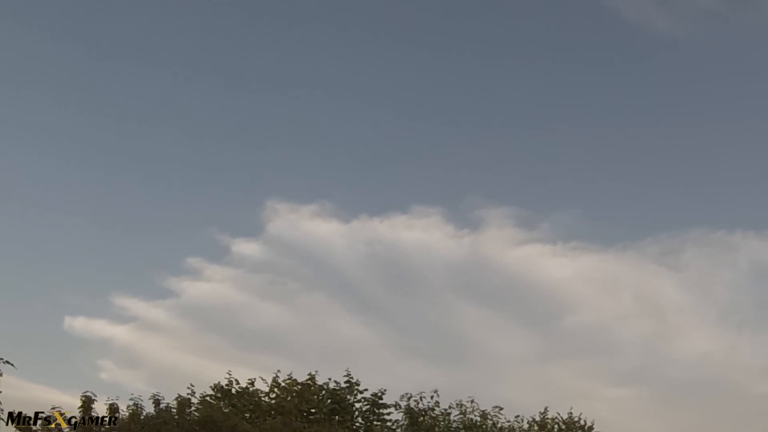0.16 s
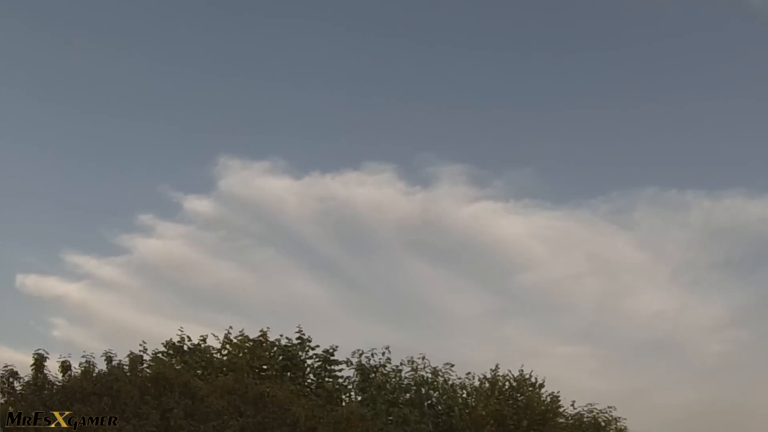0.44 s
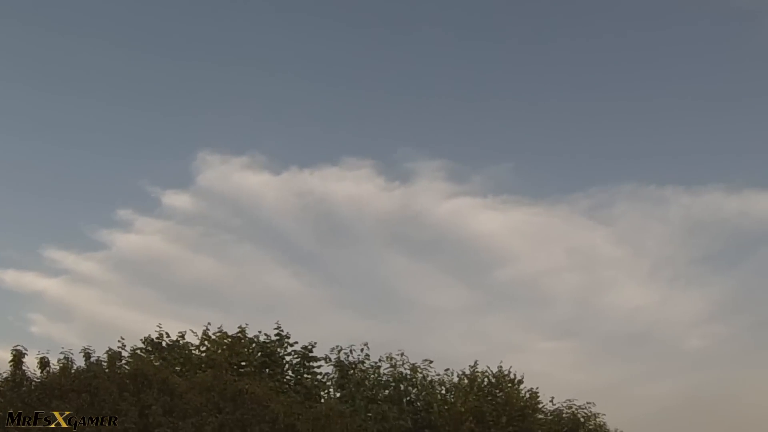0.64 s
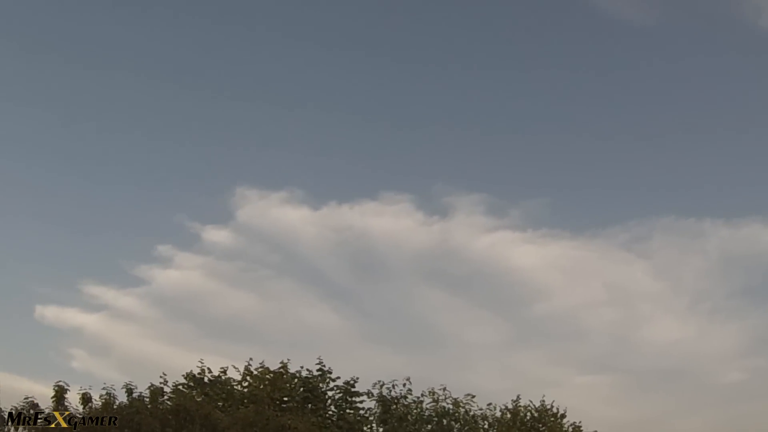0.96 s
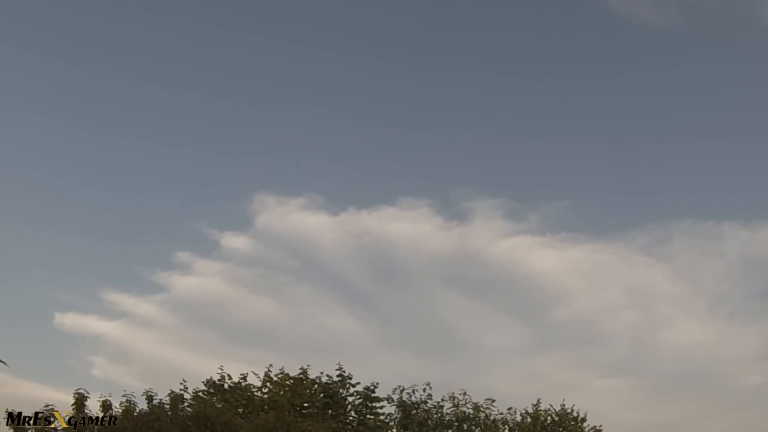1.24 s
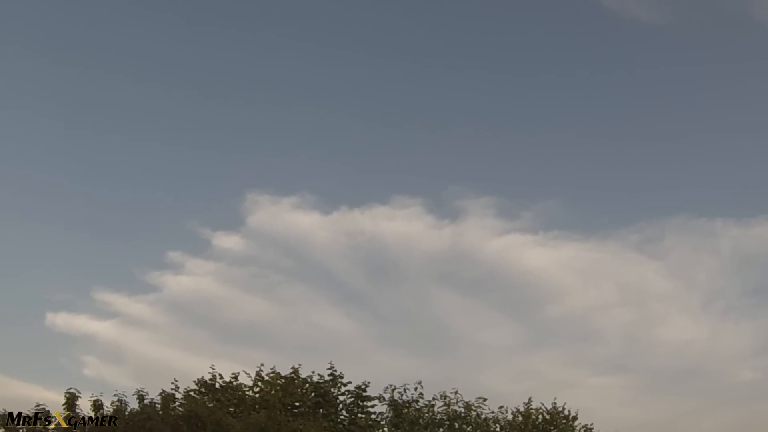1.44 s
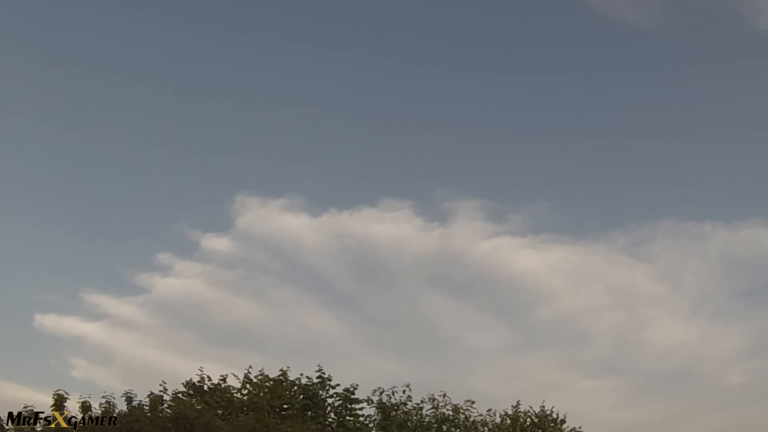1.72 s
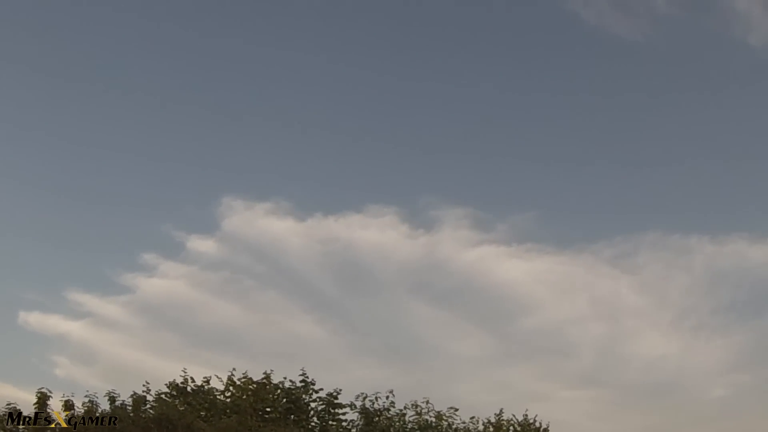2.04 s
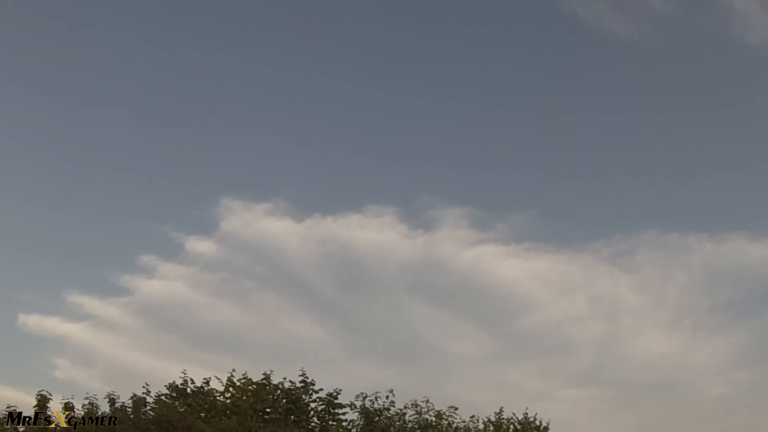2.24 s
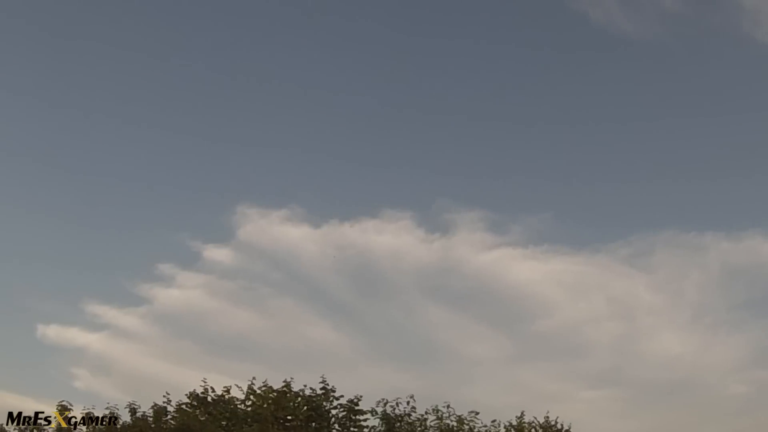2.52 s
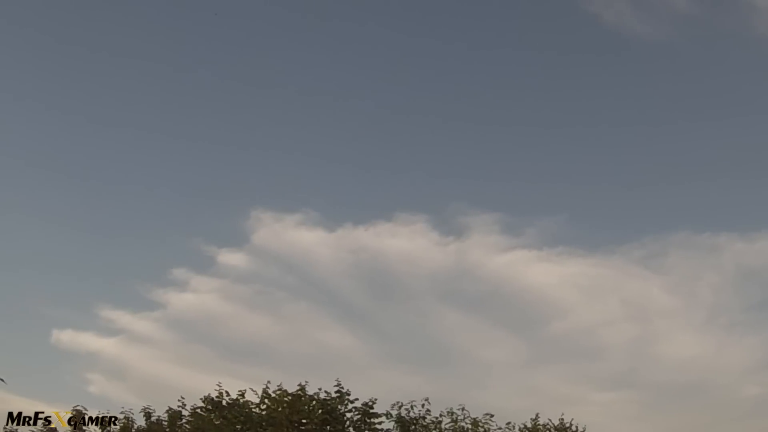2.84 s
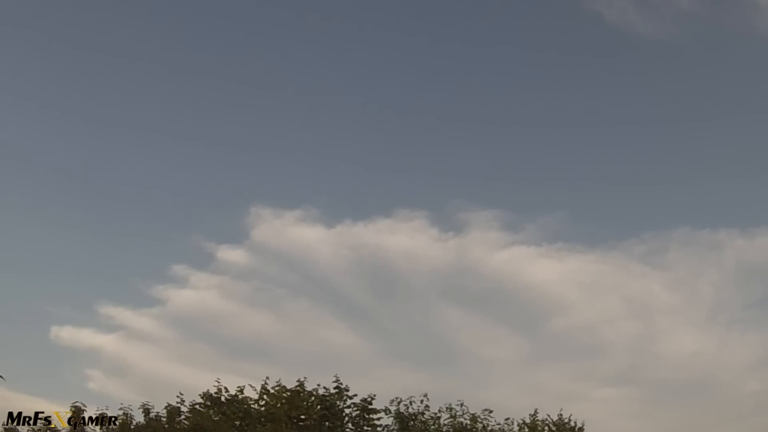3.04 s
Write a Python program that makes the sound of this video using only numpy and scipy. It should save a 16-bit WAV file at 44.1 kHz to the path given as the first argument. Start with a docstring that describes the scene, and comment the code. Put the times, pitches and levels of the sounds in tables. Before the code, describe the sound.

A helicopter approaches over open country, its fast blade slaps growing steadily louder and brighter

```python
"""A helicopter flies toward the microphone over open country, growing louder and brighter.
At first, something small rustles and clinks close by; after about a second only a few lone clinks remain.
Throughout, each of four blades gives a low thump, a knock, sharp slaps against tip vortices and a swish
of noise, while the tail rotor buzzes underneath as a fast pulse train. The slaps change colour and
balance as the distance shrinks. Steady filtered noise is the outdoor air."""
import sys
import numpy as np
from scipy import signal
from scipy.fft import rfft, irfft, next_fast_len
from scipy.io import wavfile
from scipy.ndimage import uniform_filter1d, minimum_filter1d

SR = 44100
rng = np.random.default_rng(int(sys.argv[2]) if len(sys.argv) > 2 else 0)


def output_pcm(signal):
    """Save a mono or channel-first signal as 16-bit PCM at the path in sys.argv[1].

    Samples are clipped to [-1, 1] before scaling.
    """
    pcm = np.clip(np.atleast_2d(signal).T, -1, 1) * 32767
    wavfile.write(sys.argv[1], SR, np.round(pcm).astype(np.int16))


N = 140238

# The approach, layer by layer: (time [s], thump level [dB], slap level [dB], tail rotor level [dB],
# churn level [dB], hiss level [dB], chop level [dB])
APPROACH_LEVELS = [(0, -30.5, -32.5, -25.5, -35.5, -52.5, -30), (.5, -30, -30, -26.5, -33.5, -47, -30.5),
                   (1, -30.5, -27, -25.5, -34, -48.5, -29), (1.5, -29, -26, -23.5, -32, -47, -26.5),
                   (2, -28, -23, -24, -30, -45.5, -26.5), (2.5, -27.5, -22.5, -21.5, -29, -45, -24),
                   (2.9, -26, -23, -20.5, -28.5, -43, -21), (3.18, -25, -23, -23, -27.5, -42.5, -23)]
# The four main blades in turn: (slap level [dB], level of an extra strike just before the main one [dB])
FOUR_BLADES = [(-0.5, -15.5), (1, -3), (0.94, -22), (-1.5, -11.5)]


def amp(db):
    """Decibels to gain."""
    return 10 ** (np.asarray(db) / 20)


def unit(x):
    """Scales to rms 1."""
    return x / np.sqrt(np.mean(x ** 2) + 1e-20)


def seconds(ms):
    """Milliseconds to seconds."""
    return ms / 1000


def curve(table, column=1):
    """One column of a time table, sample by sample."""
    table = np.array(table)
    return np.interp(np.arange(N) / SR, table[:, 0], table[:, column])


def colour(x, spectrum, turn=1):
    """Filters by a spectrum, falling steeply past its end; turn=1j makes each pulse a push then a pull."""
    size = next_fast_len(N + SR // 4)
    hz, db = np.transpose(spectrum)
    f = np.fft.rfftfreq(size, 1 / SR)
    gain = amp(np.interp(np.log(f + 1), np.log(hz + 1), db))
    gain = gain * (1 - np.exp(-(f / 10) ** 2))  # removes the deepest rumble
    gain = gain / np.maximum(f / hz[-1], 1) ** 6
    return irfft(rfft(x, size) * gain * turn, size)[:N]


def passes(rate, first_s):
    """Times at which a blade points at the microphone, from the summed blade rate."""
    count = np.cumsum(curve(rate)) / SR - first_s * rate[0][1]
    return np.interp(np.arange(int(count[-1]) + 1), count, np.arange(N) / SR)


def clicks(times, gains):
    """A train of single impulses."""
    at = np.round(times * SR).astype(int)
    inside = (at >= 0) & (at < N)
    return np.bincount(at[inside], (gains * np.ones(len(at)))[inside], N)


def add(mix, s, sound):
    """Mixes a sound in at a time."""
    part = mix[max(round(s * SR), 0):][:len(sound)]
    part += sound[:len(part)]


def blade_db(times):
    """The loud-soft pattern that repeats with every turn of the four-bladed rotor."""
    # How unequal the blades are: (time [s], share of their level differences [1])
    unevenness = [(1.5, 0.32), (2.1, 1.5)]
    pattern_db = np.resize(np.array(FOUR_BLADES)[:, 0], len(times))
    return pattern_db * np.interp(times, *np.transpose(unevenness))


def drift(count, wake_memory=.3):
    """Chance values that carry over in part from one blade pass to the next."""
    fresh = np.sqrt(1 - wake_memory ** 2)
    return signal.lfilter([fresh], [1, -wake_memory], rng.standard_normal(count))


def reflected(x):
    """An inverted reflection, arriving late, combs the slaps, less as they near."""
    # Reflection against the direct sound: (time [s], level [dB])
    reflection = [(.7, -6), (2.5, -14)]
    delay_ms = 2.09
    late = np.interp(np.arange(N) - seconds(delay_ms) * SR, np.arange(N), x, left=0)
    return x - amp(curve(reflection)) * late


def slap(times):
    """Each blade cuts several tip vortices: a quick cluster of pull-push spikes, rebalanced on approach."""
    # Single blades that meet a vortex with other force: (time [s], extra slap level [dB])
    hard_slaps = [(.369, 4.5), (.437, 1.5), (.506, 2), (1.19, 1.5), (1.736, 2), (1.838, 1.5), (2.147, 4.5),
                  (2.25, 0), (2.284, 5.5), (2.421, -1), (2.9, 2)]
    # Vortex strikes within one blade pass: (delay [ms], far level [dB], midway level [dB],
    # near level [dB], timing scatter [ms])
    strikes = [(-4.5, -17, -9, -11.5, 0.33), (-2, -7.5, -3, -2.5, 0.18), (0.68, -2.5, 1.5, -0.5, 0.1),
               (0.93, -3, -9.5, -7.5, 0.28), (3.5, -7.5, -14, -3, 0.29)]
    # Slap spectra from far and from nearer: (frequency [Hz], relative level per Hz [dB])
    far_spectrum = [(340, -22), (480, 7), (570, 7.5), (700, -5), (930, 7), (1120, 1.5), (1280, -4.5),
                    (1460, -10), (2000, -23.5), (2600, -20.5), (3100, -42.5), (6000, -61)]
    near_spectrum = [(200, -31.5), (350, -2), (500, 9), (720, 0), (1000, 4), (1160, -2), (1300, -7.5),
                     (1460, -23), (1650, -9.5), (1900, -35), (2650, -31), (6000, -62)]
    extra_strike_ms, spread_db = -0.46, 2

    force_db = blade_db(times)
    for s, db in hard_slaps:
        force_db[np.argmin(abs(times - s))] += db

    midway = np.interp(times, [1, 2.46], [0, 1])  # also fades in the extra strike just before the main one
    extra_strike_db = np.resize(np.array(FOUR_BLADES)[:, 1], len(times))
    train = -clicks(times + seconds(extra_strike_ms), amp(force_db + extra_strike_db) * midway)
    for delay_ms, far_db, midway_db, near_db, scatter_ms in strikes:
        db = far_db + (midway_db - far_db) * midway
        db = np.where(times > 2.3, near_db, db)  # the near balance takes over at once
        db = db + spread_db * np.tanh(rng.standard_normal(len(times)))
        strike_ms = delay_ms + scatter_ms * drift(len(times))
        train -= clicks(times + seconds(strike_ms), amp(force_db + db))

    train = reflected(train)
    near = np.interp(np.arange(N) / SR, [1, 2.58], [0, 1])
    sound = (1 - near) * unit(colour(train, far_spectrum, turn=1j))
    sound = sound + near * unit(colour(train, near_spectrum, turn=1j))
    return amp(curve(APPROACH_LEVELS, column=2)) * sound


def thump(times):
    """The broad pressure pulse pushed ahead of each blade."""
    # Thump spectrum: (frequency [Hz], relative level per Hz [dB])
    thump_spectrum = [(15, 4), (29, 0.5), (58, -2.5), (88, -13.5), (117, -13.5), (150, -21), (220, -35.5),
                      (500, -100)]
    lag_ms = 3.6
    pulses = clicks(times + seconds(lag_ms), 1)
    return amp(curve(APPROACH_LEVELS, column=1)) * unit(colour(pulses, thump_spectrum))


def chop(times):
    """The steady low-middle knock of each blade's load, nearly the same every pass."""
    # Knock spectrum: (frequency [Hz], relative level per Hz [dB])
    chop_spectrum = [(100, -43.5), (185, -11.5), (230, -5.5), (290, 1), (330, 1.5), (380, -3), (440, -8),
                     (500, -6.5), (560, -6.5), (640, -16), (1100, -36)]
    lag_ms, scatter_ms, spread_db = -0.33, 0.016, 0.85
    late, strength = rng.standard_normal((len(times), 2)).T
    train = clicks(times + seconds(lag_ms + scatter_ms * late), amp(spread_db * strength))
    return amp(curve(APPROACH_LEVELS, column=6)) * unit(colour(-train, chop_spectrum))


def swish(times, spectrum, lag_ms, rise_ms, fall_ms, between_db):
    """Turbulent noise that swells as each blade sweeps forward, over a floor between blades."""
    t = np.arange(-SR // 20, SR // 20) / SR
    shape = np.exp(-abs(t) / seconds(np.where(t < 0, rise_ms, fall_ms)))
    blades = clicks(times + seconds(lag_ms), amp(blade_db(times) / 2))
    swell = signal.fftconvolve(blades, shape, "same")
    level = np.hypot(swell, amp(between_db))
    return unit(colour(level * rng.standard_normal(N), spectrum))


def turbulence(times):
    """Low churn and high hiss off the blades; the air absorbs less treble as the distance shrinks."""
    # Noise spectra: (frequency [Hz], relative level per Hz [dB])
    churn_spectrum = [(20, -19.5), (60, -10.5), (130, -12.5), (200, 4), (320, 0), (500, 3), (750, -1),
                      (1150, 0.5), (1450, -9.5), (1700, -10), (2100, -14.5), (3500, -58)]
    hiss_spectrum = [(600, -34), (1500, -3), (2000, 3), (2500, 1.5), (2900, -2.5), (3500, -3), (4300, -10),
                     (6500, -27), (8000, -38), (15000, -79)]
    brighten_db_per_s, bright_hz = 6, 4500

    churn = swish(times, churn_spectrum, lag_ms=2.1, rise_ms=9.5, fall_ms=11, between_db=-12.5)
    hiss = swish(times, hiss_spectrum, lag_ms=1, rise_ms=4, fall_ms=8, between_db=-10)
    highpass = signal.butter(2, bright_hz, "high", fs=SR, output="sos")
    top = signal.sosfiltfilt(highpass, hiss)
    top_db = brighten_db_per_s * (np.arange(N) - N / 2) / SR
    hiss = hiss + top * (amp(top_db) - 1)
    churn = amp(curve(APPROACH_LEVELS, column=4)) * churn
    return churn + amp(curve(APPROACH_LEVELS, column=5)) * hiss


def tail_rotor():
    """A fast train of push-pull pulses with one short echo."""
    # Tail rotor speed: (time [s], blade passes per second [1/s])
    tail_rate = [(0, 82.7), (2, 82.7), (2.6, 82.35), (3.18, 82.25)]
    # Buzz spectrum: (frequency [Hz], relative level per Hz [dB])
    tail_spectrum = [(40, -56.5), (83, -7), (165, 3.5), (248, 2), (330, -1.5), (413, 0), (496, 1),
                     (580, -8), (740, -11), (1100, -26), (3000, -70.5)]
    scatter_ms, spread_db, echo_ms, echo_db = 0.054, 0.5, 3.29, -8

    times = passes(tail_rate, first_s=.0072)
    late, strength = rng.standard_normal((len(times), 2)).T
    times = times + seconds(scatter_ms * late)
    gains = amp(spread_db * strength)
    train = clicks(times, gains) + clicks(times + seconds(echo_ms), gains * amp(echo_db))
    return amp(curve(APPROACH_LEVELS, column=3)) * unit(colour(train, tail_spectrum, turn=1j))


def clink(low_db, count=4):
    """A few quick, weakening bounces; each rings the metal's modes in a different mix."""
    # Modes of the metal piece: (frequency [Hz], level [dB], time to fall by 60 dB [s])
    metal_modes = [(8230, -7, .12), (12720, -8, .11), (14700, -6, .06), (15180, -9, .06)]
    bounce_ms, bounce_loss_db, spread_db, ring_detune = 5, 2.5, 2.5, .008

    t, sound = np.arange(SR // 5) / SR, np.zeros(SR // 5)
    gaps = seconds(bounce_ms) * rng.uniform(.5, 2, count)
    for bounce, s in enumerate(np.cumsum(gaps) - gaps[0]):
        for k, (hz, mode_db, t60) in enumerate(metal_modes):
            strength, detune = rng.uniform(-0.84, 1, 2)
            db = mode_db + spread_db * strength - bounce_loss_db * bounce
            if k == 0:
                db += low_db
            ring = np.sin(2 * np.pi * hz * (1 + ring_detune * detune) * t)
            add(sound, s, amp(db - 60 * t / t60) * ring)
    return sound


def handling():
    """Brief grainy scuffs and the ticking jingle of a small metal piece beside the microphone."""
    # Close rustles, each peaking at half its length: (time [s], length [s], level [dB])
    rustles = [(0.083, 0.014, -59), (0.265, .008, -52.5), (0.447, 0.0049, -53), (0.47, 0.0072, -50),
               (0.494, 0.013, -50), (0.57, 0.013, -54), (0.606, .007, -51), (0.745, 0.0066, -58),
               (0.804, .03, -60), (1.062, 0.0035, -40)]
    # Rustle spectrum: (frequency [Hz], relative level per Hz [dB])
    rustle_spectrum = [(1500, -5), (3500, 7.5), (6000, -3.5), (8500, -4), (11000, -14), (15000, -24)]
    # Small metal clinks: (time [s], level [dB], extra level of the lowest mode [dB])
    clinks = [(.086, -60, -9), (.453, -54, 2), (.47, -56, -10), (0.487, -57, -6), (.499, -56, 6),
              (.583, -65, 8), (.636, -62, -11), (.748, -63, -4), (.787, -66, -6), (1.115, -57, -3),
              (1.389, -60, -16), (2.038, -62, -12)]
    grain_db = 6.5

    t, scuffs, rings = np.arange(SR // 5) / SR, np.zeros(N), np.zeros(N)
    for s, length, db in rustles:
        add(scuffs, s, amp(db) * t / length * np.exp(1 - 2 * t / length) * 2)
    for s, db, low_db in clinks:
        add(rings, s, amp(db) * clink(low_db))
    slow_noise = unit(uniform_filter1d(rng.standard_normal(N), size=70))
    grains = amp(grain_db * np.clip(slow_noise, -2, 2))
    return scuffs * unit(colour(grains * rng.standard_normal(N), rustle_spectrum)) + rings


def outdoor_air():
    """The background of the open country: steady noise, mostly low."""
    # Air spectrum: (frequency [Hz], relative level per Hz [dB])
    air_spectrum = [(20, -6.5), (100, -5), (500, -1), (2000, -37), (5000, -34.5), (8000, -44.5),
                    (11000, -49), (15000, -63)]
    return amp(-40) * unit(colour(rng.standard_normal(N), air_spectrum))


def scene():
    """Both rotors over the outdoor air, with the small close sounds."""
    # Main rotor speed: (time [s], blade passes per second [1/s])
    blade_rate = [(0, 29.23), (1, 29.24), (1.5, 29.265), (1.9, 29.22), (2.3, 29.13), (2.8, 29.09),
                  (3.18, 29.09)]
    times = passes(blade_rate, first_s=.0268)
    main_rotor = slap(times) + thump(times) + chop(times) + turbulence(times)
    return (main_rotor + tail_rotor() + handling() + outdoor_air())[None]


def record(dry):
    """A gentle limiter holds peaks above its ceiling; then the recorder's band limit."""
    ceiling, edge_hz = .8, 15450
    room = np.minimum(1, ceiling / (abs(dry) + 1e-9))
    gain = minimum_filter1d(room, size=441)
    gain = uniform_filter1d(uniform_filter1d(gain, size=221), size=221)
    lowpass = signal.firwin(511, edge_hz, window=("kaiser", 9), fs=SR)
    return signal.oaconvolve(dry * gain, lowpass[None], "same")


dry = scene()
out = record(dry)
output_pcm(out)
```